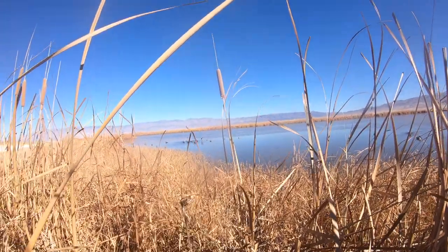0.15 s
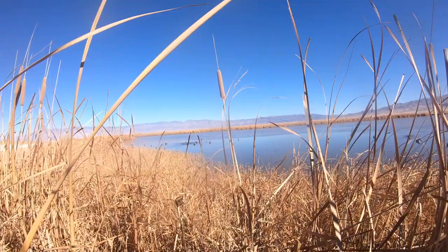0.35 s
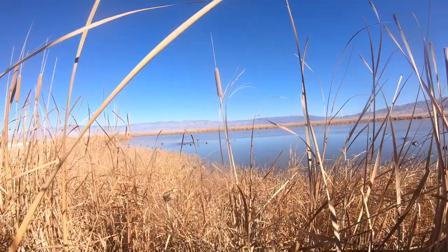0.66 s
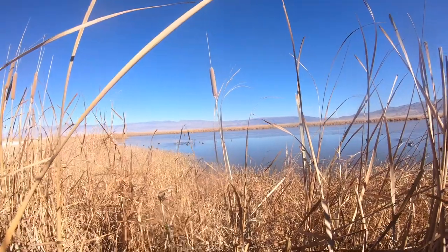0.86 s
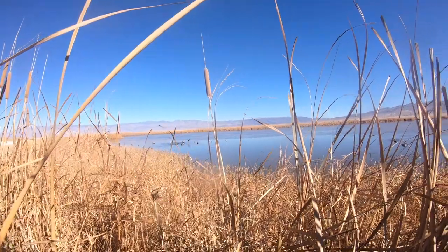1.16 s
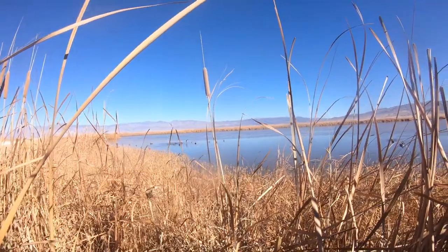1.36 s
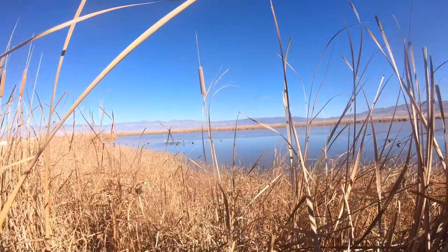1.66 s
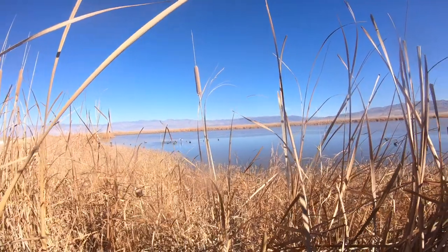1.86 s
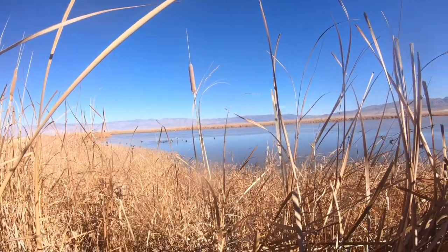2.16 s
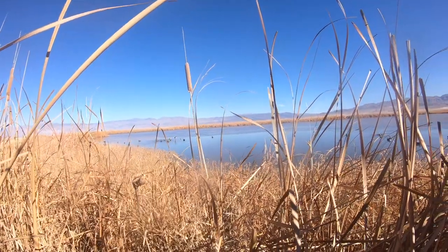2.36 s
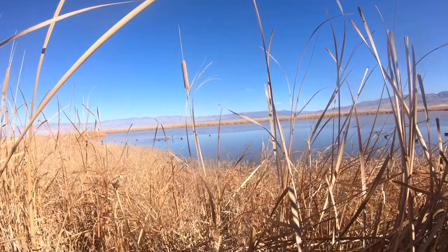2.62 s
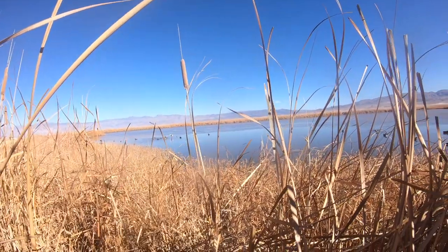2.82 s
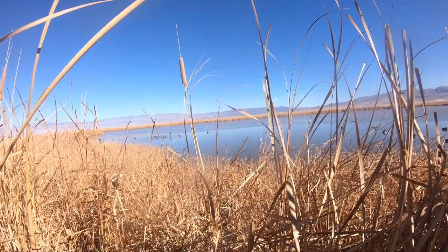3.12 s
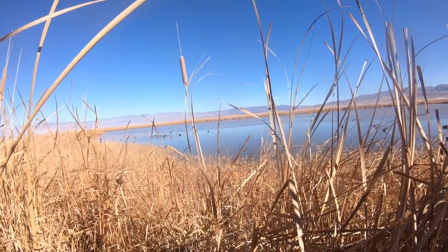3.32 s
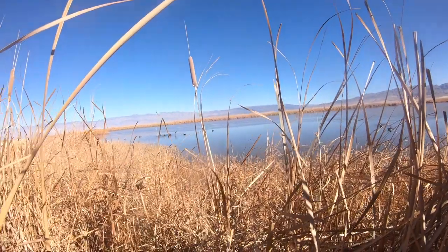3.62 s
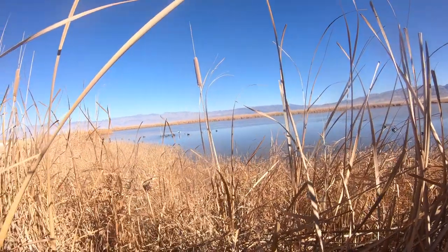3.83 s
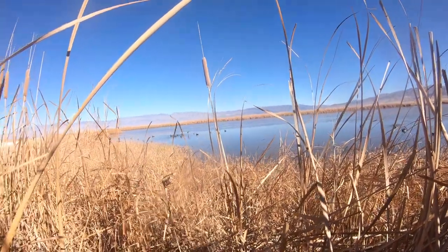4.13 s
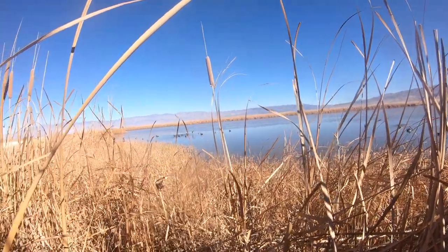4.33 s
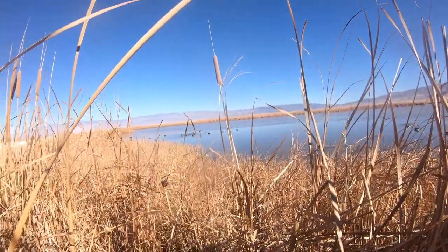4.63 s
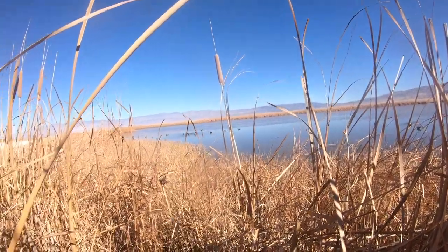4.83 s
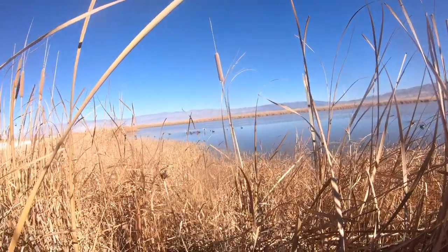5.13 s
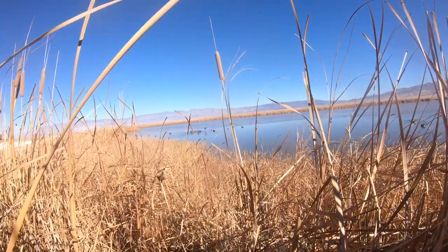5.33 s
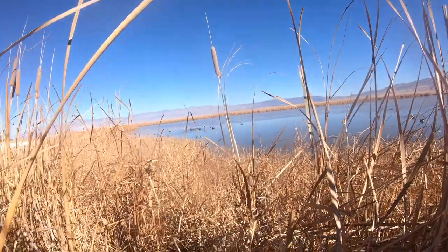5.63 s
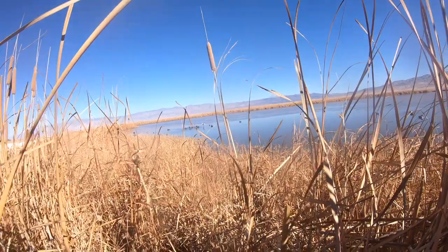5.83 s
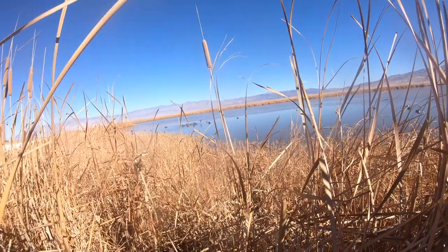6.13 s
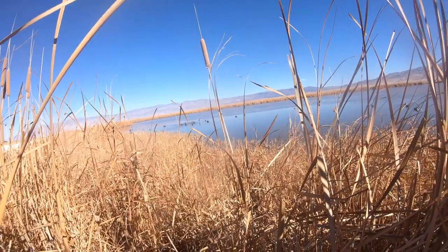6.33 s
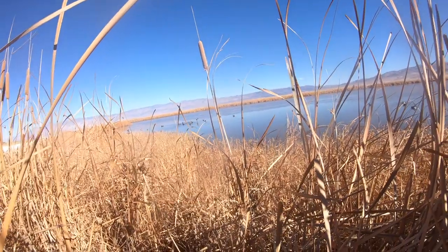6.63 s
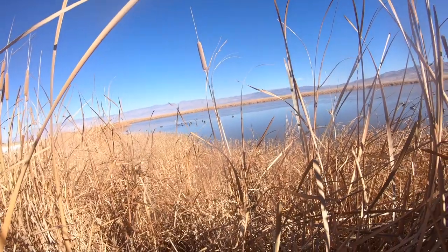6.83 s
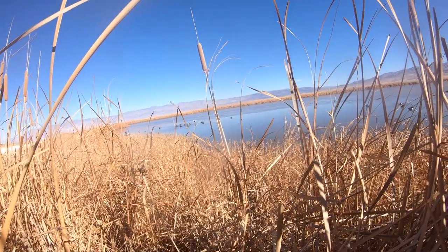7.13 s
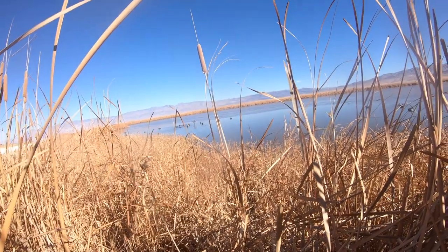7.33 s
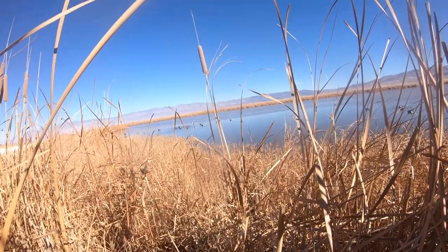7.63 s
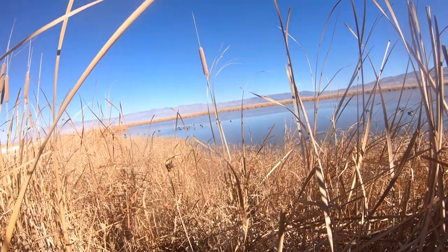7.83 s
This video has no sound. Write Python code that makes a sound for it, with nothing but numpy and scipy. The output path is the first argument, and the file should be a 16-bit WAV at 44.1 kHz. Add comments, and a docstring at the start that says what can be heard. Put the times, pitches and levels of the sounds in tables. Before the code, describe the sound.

Very close to a bed of dry reeds beside open water, blades rub in crisp, hissing sways, strongest in the first second, with scraping hollow stems. Quieter rustles come and go, with occasional ticks and snaps. In the last second the crackling thickens, a stalk strikes the microphone with a sharp, loud click on the right, and a low wind buffet follows. A faint rumble and hush lie far off.

```python
"""Beside a pond in a breeze, microphone close to a bed of dry reeds that stands mostly to the right.
Blades rub in sways of stick-slip noise, with small resonant ticks, knocks of hollow stems and fibre snaps.
Near the end a stalk hits the camera: a sharp click of decaying modes clips the right side and rings faintly.
Low noise swells as gusts buffet the microphone; a low rumble and a faint hush lie in the distance."""
import sys
import numpy as np
from scipy import signal
from scipy.fft import rfft, irfft, next_fast_len
from scipy.io import wavfile
from scipy.ndimage import uniform_filter1d, map_coordinates

SR = 44100
rng = np.random.default_rng(int(sys.argv[2]) if len(sys.argv) > 2 else 0)


def wrap_up_sound(samples):
    """Save the sound to the file named by the first command line argument, as 16-bit audio."""
    columns = np.atleast_2d(samples).T
    # keep every value between -1 and 1, then stretch to whole-number steps
    tamed = np.clip(columns, -1, 1)
    steps = np.round(tamed * 32767).astype(np.int16)
    wavfile.write(sys.argv[1], SR, steps)


N = 351477

# Close reeds, each sway sliding blades and stems over each other: start t/s, fastest t/s, end t/s,
# blade rel. level/dB, hollow stems over blades level/dB, scrape over blades level/dB
REED_SWAYS = [(-0.5, 0.07, 0.13, -37.0, 0.5, -5.5), (-0.03, 0.3, 0.61, -36.5, -4.2, -6.7),
              (0.37, 0.47, 0.54, -42.5, -8.5, -15.5), (0.57, 0.77, 1.01, -38.5, -8.0, -12.5),
              (0.8, 1.06, 1.21, -44.5, -9.0, -20.0), (0.95, 1.48, 1.54, -52.2, 3.0, -10.3),
              (1.48, 1.71, 1.83, -46.0, -7.0, -16.5), (1.57, 2.0, 2.4, -58.5, 5.0, -1.0),
              (1.94, 2.24, 2.35, -42.5, -9.0, -16.5), (1.89, 2.54, 2.69, -37.5, -4.0, -9.5),
              (2.66, 2.82, 3.16, -39.5, -10.0, -16.0), (2.86, 3.04, 3.07, -50.5, -11.0, -19.5),
              (3.01, 3.22, 3.42, -45.5, -4.5, -9.5), (3.35, 3.38, 3.8, -50.5, -4.0, -16.0),
              (3.49, 3.56, 3.65, -53.0, -6.5, -16.0), (3.88, 4.13, 4.36, -45.0, -8.5, -18.5),
              (3.82, 4.35, 4.81, -40.0, -5.5, -13.5), (4.05, 4.7, 4.82, -42.5, -5.0, -10.5),
              (4.8, 4.92, 5.29, -39.5, -14.5, -22.5), (4.86, 4.98, 5.16, -44.5, -7.0, -8.0),
              (5.17, 5.37, 5.61, -45.2, -9.5, -14.0), (5.11, 5.8, 5.96, -51.5, -1.0, -16.0),
              (5.99, 6.28, 6.39, -47.0, -6.5, -16.0), (6.35, 6.47, 6.88, -43.0, -9.0, -13.5),
              (6.76, 6.86, 7.09, -46.5, -9.0, -22.5), (6.97, 7.03, 7.19, -41.5, -7.0, -17.5),
              (7.36, 7.4, 7.46, -39.3, -4.5, -8.5), (7.09, 7.44, 7.58, -43.2, -6.0, -19.0),
              (7.5, 7.66, 7.73, -42.5, -5.5, -7.0), (7.66, 7.74, 7.98, -48.5, -1.5, -5.5)]
SPEED_POWER = 1.18  # rubbing amplitude against sliding speed
IDLE_DB, HOLLOW_BED_DB, SCRAPE_BED_DB = -64, -62.5, -69  # the bed that never quite rests


def sway():
    """Reeds speed up from rest and slow to the next turn; gives the power of blades, hollow stems, scrape."""
    t = np.arange(N) / SR
    power = amp([[IDLE_DB], [HOLLOW_BED_DB], [SCRAPE_BED_DB]]) ** 2 * breeze()
    for start, fastest, end, level_db, hollow_db, scrape_db in REED_SWAYS:
        moving = slice(*np.searchsorted(t, [start, end]))
        phase = np.interp(t[moving], [start, fastest, end], [0, .5, 1])
        speed = np.abs(np.sin(np.pi * phase))
        levels = amp(level_db) * amp([[0], [hollow_db], [scrape_db]])
        power[:, moving] += (levels * speed ** SPEED_POWER) ** 2
    return power


# Lulls over the idle reed bed and the far hush: middle t/s, length t/s, strength level/dB
# (at 0 dB the power halves)
BREEZE_LULLS = [(3.8, 0.56, 0.5), (6.0, 0.14, -5)]


def breeze():
    """Share of the breeze's usual power that is left in the lulls."""
    return 1 / (1 + swells(BREEZE_LULLS))


# Spectrum of rubbing blades, close: f/Hz, level/dB
BLADE_SPECTRUM = [(250, -29), (900, -12.5), (1900, -1.5), (2700, -2.5), (3400, -0.5), (4400, -4),
                  (5200, -2.5), (6300, -5), (7900, 1.5), (9100, -1.5), (10000, -11), (11600, -20),
                  (13000, -18.5), (15500, -30)]
# Brighter spectrum of frayed tips and flicked blades, close: f/Hz, level/dB
FLICK_SPECTRUM = [(300, -22), (1500, -2.5), (3400, -5), (4500, -4), (6500, -2.5), (8500, 5.5), (9050, 2),
                  (9700, -5.5), (11500, -17.5), (15500, -25)]


def blades(level_db):
    """Faster sliding makes more slips: a loose crackle thickens into a hiss."""
    rate = 9000 * amp(.8 * (level_db + 42))
    grain = unit(slips(rate, scatter_db=0.5) + 1.1 * rng.standard_normal((2, N)))
    hiss_gain = amp(level_db + 3.5 + 0.95 * wobble(35))
    hiss = hiss_gain * coloured(patchy(grain, depth_db=1.75), BLADE_SPECTRUM)
    # frayed tips crackle brightly, and fade less than the hiss when the sliding slows
    tips = slips(3500, scatter_db=2.5) * amp(5.6 * wobble(20))
    return hiss + amp(-55.0 + 0.57 * (level_db + 45.0)) * coloured(tips, FLICK_SPECTRUM)


# Close stalks that jam and grind for a moment: middle t/s, length t/s, level/dB
STALK_JAMS = [(.095, 0.11, -35.5), (.15, 0.067, -34.5), (.24, .12, -48), (1.685, 0.075, -43.5),
              (2.22, 0.057, -47), (2.38, .04, -41.5), (2.53, .05, -48), (2.89, .12, -50.5),
              (5.3, 0.12, -51), (7.645, 0.077, -46)]
# Spectrum of stems scraping: f/Hz, level/dB
SCRAPE_SPECTRUM = [(130, -18), (280, 3), (400, 2.5), (600, 0), (1000, -3), (2000, -48)]
# Spectrum of the air in hollow stems: f/Hz, level/dB
HOLLOW_SPECTRUM = [(350, -57), (620, -5), (820, 1), (1030, -2), (1280, 1.5), (1600, -7), (3000, -39.5)]
JAM_RING_DB = -4.5  # how strongly a jam sounds the hollow stems


def stalks(hollow_power, scrape_power):
    """Hollow stems colour the rustle, and scrape in lumps where they press together."""
    jams = swells(STALK_JAMS)
    grinding = np.sqrt(scrape_power + jams)
    rustling = np.sqrt(hollow_power + amp(JAM_RING_DB) ** 2 * jams)
    scrape_noise = unit(coloured(slips(1500, scatter_db=3.0), SCRAPE_SPECTRUM))
    scrape = scrape_noise * grinding * amp(-3.0 + 3.34 * wobble(24))
    hollow_noise = patchy(slips(6000, scatter_db=2.5), depth_db=2.0)
    hollow = unit(coloured(hollow_noise, HOLLOW_SPECTRUM)) * rustling * amp(-0.93 + 0.43 * wobble(12))
    return scrape + hollow


# Close stems that rub slowly: middle t/s, length t/s, level/dB
STEM_RUBS = [(1.32, 0.74, -53.5), (3.4, 0.74, -57.5)]


def slow_rub():
    """Stems that barely move rub in one narrow resonance."""
    return np.sqrt(swells(STEM_RUBS)) * shiver(1223, sharpness=5.1, size=N)


# Close blades that catch and flick free: t/s, crack rel. level/dB, blade f/Hz,
# stem knock rel. level/dB, stem f/Hz, decay by 60 dB t/s
BLADE_TICKS = [(1.0485, -28.5, 8700, -46, 1450, 0.034), (1.458, -43, 8000, -40, 1260, 0.08),
               (1.648, -43, 8000, -43, 3300, .07), (1.668, -30, 7600, -36, 1500, 0.1),
               (1.706, -36, 7000, -40, 1500, 0.11), (1.749, -37, 8000, -43, 2600, 0.06),
               (4.138, -27.5, 7940, -41, 3400, 0.068), (5.428, -36.5, 8550, -62, 1250, 0.085),
               (6.699, -37.5, 8300, -44, 3500, 0.057), (6.939, -36, 8500, -47, 3600, .03),
               (7.042, -32.5, 8500, -51, 2210, 0.03), (7.197, -37, 8600, -50, 696, 0.039),
               (7.24, -34.5, 8900, -38, 1530, 0.032), (7.305, -31.5, 9040, -55, 1280, 0.073),
               (7.385, -32.5, 8200, -37.5, 1210, 0.061), (7.4157, -31.5, 8070, -41, 3340, .035),
               (7.592, -26, 7550, -35, 3400, 0.046), (7.645, -33, 7450, -37.5, 3000, 0.087),
               (7.657, -29.5, 5900, -36, 2300, 0.04), (7.666, -32, 6800, -43, 2600, 0.068),
               (7.814, -37.5, 7640, -45, 1900, 0.1)]


def ticks():
    """Each flick is a dying, thinly pitched shiver of the blade that also knocks its hollow stem."""
    bright, tones = np.zeros((2, 2, N))
    t = np.arange(SR // 5) / SR
    for s, crack_db, blade_hz, stem_db, stem_hz, t60 in BLADE_TICKS:
        age = t / t60
        shape = amp(-60 * age) * (1 - np.exp(-age / 0.012))  # longer flicks also take longer to build
        add(bright, s, amp(crack_db + 1.0) * shape * rng.standard_normal((2, len(t))))
        add(tones, s, amp(crack_db - 0.5) * shape * shiver(blade_hz, sharpness=5.8, size=len(t)))
        add(tones, s, amp(stem_db + 2.0) * shape * shiver(stem_hz, sharpness=2.1, size=len(t)))
    return coloured(bright, FLICK_SPECTRUM) + tones


# Close hollow stems that knock together: t/s, rel. level/dB, lowest f/Hz, decay by 60 dB t/s,
# upper modes level/dB
STEM_TAPS = [(1.0495, -31, 740, .028, -14), (1.666, -26, 1700, .016, -8), (1.6705, -31, 760, .03, -6),
             (6.686, -27.5, 861, 0.045, 0), (7.5793, -25.5, 1110, 0.034, -7), (7.6325, -22, 680, 0.015, -6),
             (7.656, -26, 654, 0.018, 1)]
# Modes of a hollow stem: multiple of its lowest f, level/dB
STEM_MODES = [(1, -0.5), (1.73, -4), (2.42, -7), (3.07, -14)]
TAP_ATTACK_S, TAP_ROUGH = .0007, .25  # build-up, and share of the ring's power turned into buzz


def taps():
    """A knocked hollow stem rings briefly, with a dry buzz, in a few modes above its lowest pitch."""
    track, t = np.zeros((2, N)), np.arange(SR // 5) / SR
    for s, db, hz, t60, upper_db in STEM_TAPS:
        shape = amp(db - 60 * t / t60) * (1 - np.exp(-t / TAP_ATTACK_S))
        for k, (ratio, level) in enumerate(STEM_MODES):
            tone = np.sin(2 * np.pi * (hz * ratio * t + rng.random((2, 1))))
            buzz = shiver(hz * ratio, sharpness=2.4, size=len(t))
            ring = np.sqrt(1 - TAP_ROUGH) * tone + np.sqrt(TAP_ROUGH / 2) * buzz
            add(track, s, amp(level + (upper_db if k else 0)) * shape * ring)
    return track


# Close dry fibres that snap: t/s, level/dB
FIBRE_SNAPS = [(1.051, -29), (1.0983, -22), (1.666, -12), (1.6705, -22), (1.7492, -29), (6.9272, -24),
               (7.0466, -31), (7.0788, -30), (7.5948, -21.5), (7.5988, -27), (7.613, -27), (7.621, -30),
               (7.6333, -26), (7.6563, -20.5), (7.673, -28), (7.782, -35)]
SNAP_T60_S = 0.004


def snaps():
    """A dry fibre gives way at once: a hard, broad crack with no ring."""
    track, t = np.zeros((2, N)), np.arange(SR // 20) / SR
    for s, db in FIBRE_SNAPS:
        add(track, s, amp(db - 60 * t / SNAP_T60_S) * rng.standard_normal((2, len(t))))
    return coloured(track, BLADE_SPECTRUM)


# How the two microphone ports hear the near reeds: f/Hz, left minus right level/dB,
# left lead/rad, coherence (0-1)
PORT_DIFFERENCES = [(500, .6, -.2, .8), (800, -6.5, -1, .7), (1200, -6.5, .3, .6), (2000, -6, .1, .6),
                    (3000, -3.3, .2, .7), (4200, -2.2, 0, .7), (5200, -4.4, -.7, .42), (6300, -3, -1, .2),
                    (7200, -5.5, -2.1, .2), (7900, -11.5, -3.6, .3), (8800, -4, -3.8, .3),
                    (10500, -1.5, -3.8, .05), (15000, -1.3, -3.8, 0)]


def ports(pair):
    """The right port faces the reeds; the left hears them shaded, shifted and partly scattered."""
    shade, lead, alike = (np.array(PORT_DIFFERENCES)[:, [0, k]] for k in range(1, 4))

    def direct_response(hz):
        return amp(along(shade, hz)) * along(alike, hz) * np.exp(1j * along(lead, hz))

    def scattered_response(hz):
        return amp(along(shade, hz)) * np.sqrt(1 - along(alike, hz) ** 2)

    left = filtered(pair[0], direct_response) + filtered(pair[1], scattered_response)
    return np.array([left, pair[0]])


# Modes of the struck stalk and camera body, at the microphone: f/Hz, rel. level/dB, decay by 60 dB t/s
KNOCK_MODES = [(547, -27, 0.088), (660, -30, 0.12), (890, -8, 0.029), (1090, -4.5, 0.017),
               (1360, -8.5, 0.02), (1587, -5.5, 0.023), (1840, -7, 0.023), (1990, -8, 0.025),
               (3070, 4, 0.012), (3210, -9.5, 0.019), (7520, -6.5, 0.0085), (931, -39.5, 0.56),
               (980, -36, 0.44), (1020, -37, 0.37), (1390, -42, .4), (1440, -34.5, 0.89), (1760, -44, 0.66)]
CHATTER_DB, CHATTER_HZ, CHATTER_T60_S = -20.5, 1900, 0.059  # the stalk rattles on the camera
HALO_DB, HALO_HZ, HALO_T60_S = -40, 1340, 0.74  # many weak stalk modes blur into a woody afterglow


def click(s=7.7222, lead=.0019):
    """A stalk grazes the camera, then lands with a crack, rings the modes of both and chatters."""
    knock, crack, scratch = np.zeros((3, 2, N))
    t = np.arange(SR // 2) / SR
    ring = np.zeros((2, len(t)))
    for hz, db, t60 in KNOCK_MODES:
        # phase zero on the struck right side, a random phase on the left
        phase = rng.random() * np.array([[1], [0]])
        ring += amp(db - 60 * t / t60) * np.sin(2 * np.pi * (hz * t + phase))
    attack = 1 - np.exp(-t / .0003)
    chatter = shiver(CHATTER_HZ, sharpness=1, size=len(t))
    halo = shiver(HALO_HZ, sharpness=1.6, size=len(t))
    add(knock, s, amp(-1.0) * ring * attack)
    add(knock, s, amp(CHATTER_DB - 60 * t / CHATTER_T60_S) * attack * chatter)
    add(knock, s, amp(HALO_DB - 60 * t / HALO_T60_S) * attack * halo)
    graze = amp(-12 - 60 * t / .022) + amp(-36 - 60 * t / .09)  # a quick decay and a weak longer tail
    add(scratch, s - lead, graze * rng.standard_normal((2, len(t))))
    add(crack, s, amp(-17.0 - 60 * t / 0.027) * rng.standard_normal((2, len(t))))
    noise = coloured(scratch, FLICK_SPECTRUM) + coloured(crack, BLADE_SPECTRUM)
    return knock * amp([[-12], [0]]) + ports(noise)  # the knock is 12 dB weaker on the left


# Gusts that reach the microphone: middle t/s, length t/s, rel. level/dB
MICROPHONE_GUSTS = [(0, .14, -47), (1.2, .15, -58), (4.54, .1, -57), (4.71, 0.11, -52), (5.4, 0.21, -53.5),
                    (5.695, 0.16, -41.5), (6.36, 0.13, -56), (7.16, .15, -52), (7.42, 0.24, -45),
                    (7.69, 0.21, -43), (7.94, 0.27, -29.5)]
# Spectrum of slow eddies on the microphone: f/Hz, level/dB
BUFFET_SPECTRUM = [(8, -17), (22, -7), (33, -8.5), (54, -14), (85, -22), (130, -33), (500, -74)]
# Spectrum of the faster eddies in strong gusts: f/Hz, level/dB
BLAST_SPECTRUM = [(15, -17), (33, 5), (50, -5), (71, 2.5), (92, -14), (140, -20), (500, -76)]
BREEZE_DB, BREEZE_SWING_DB = -67.5, 2.5  # light air on the microphone between gusts


def buffeting():
    """Eddies push on both ports, with slow ones less alike; the strongest gusts break into faster ones."""
    light_air = amp(BREEZE_DB + BREEZE_SWING_DB * wobble(9.7)) ** 2
    gust_db = 10 * np.log10(swells(MICROPHONE_GUSTS) + light_air)
    slow = unit(coloured(rng.standard_normal((2, N)), BUFFET_SPECTRUM))
    fast = unit(coloured(rng.standard_normal((2, N)), BLAST_SPECTRUM))
    strong = np.clip((gust_db + 37) / 4, 0, 1)
    slow_eddies = spread(slow, side_db=-3) * np.sqrt(1 - strong)
    fast_eddies = amp(1.5) * spread(fast, side_db=-17) * np.sqrt(strong)
    return amp(gust_db + wobble(12)) * (slow_eddies + fast_eddies)


# Course of the far rumble: t/s, rel. level/dB
RUMBLE_LEVEL = [(0, -53.5), (.55, -52), (1, -53.5), (1.9, -57), (2.55, -56), (3.45, -54), (3.85, -59),
                (4.2, -55.5), (6.3, -56.5), (6.9, -58), (7.45, -53), (7.97, -53)]
# Spectrum of the far rumble: f/Hz, level/dB
RUMBLE_SPECTRUM = [(25, -25), (60, -11), (108, -25), (148, 3.5), (175, -0.5), (215, -1.5), (275, -14.5),
                   (520, -25), (2000, -57)]
# Spectrum of the far hush: f/Hz, level/dB
HUSH_SPECTRUM = [(250, -13), (520, -10.5), (810, 0), (1100, -8), (2500, -17.5), (9000, -30), (15000, -56)]


def distance():
    """A wavering low rumble and a faint hush, dipping slightly in the lulls, from across the open water."""
    rumble_db = np.interp(np.arange(N) / SR, *np.transpose(RUMBLE_LEVEL))
    rumble = unit(coloured(rng.standard_normal((2, N)), RUMBLE_SPECTRUM))
    hush = unit(coloured(rng.standard_normal((2, N)), HUSH_SPECTRUM))
    far_rumble = amp(rumble_db - 0.5 + wobble(6.9)) * spread(rumble, side_db=-5.5)
    return far_rumble + amp(-65.5) * breeze() ** .25 * spread(hush, side_db=9.0)


def slips(rate, scatter_db):
    """Tiny stick-slip impulses of uneven size, rate a second, scaled to rms 1."""
    hit = rng.random((2, N)) < rate / SR
    sizes = amp(scatter_db * rng.standard_normal((2, N))) * rng.standard_normal((2, N))
    return unit(hit * sizes / np.sqrt(rate))


def shiver(hz, sharpness, size):
    """Stereo noise of rms 1 passed twice through one resonance."""
    resonance = signal.iirpeak(hz, sharpness, SR)
    once = signal.lfilter(*resonance, rng.standard_normal((2, size)))
    return unit(signal.lfilter(*resonance, once))


def patchy(x, depth_db):
    """Slow random patches of gain over time and frequency, as different blades take their turn."""
    z = signal.stft(x, nperseg=512)[2]
    field = uniform_filter1d(rng.standard_normal(z.shape[1:]), size=4, axis=0)  # across frequency
    field = uniform_filter1d(field, size=12, axis=1)  # across time
    return unit(signal.istft(z * amp(depth_db * unit(field)), nperseg=512)[1][:, :N])


def swells(rows):
    """Summed power of smooth swells (middle t/s, length t/s, level/dB)."""
    t = np.arange(N) / SR
    return sum((amp(db) * np.cos(np.pi * np.clip((t - s) / length, -.5, .5))) ** 2
               for s, length, db in rows)


def wobble(rate):
    """A smooth random curve, rate knots a second."""
    knots = rng.standard_normal(int(N * rate / SR) + 4)
    return map_coordinates(knots, [np.arange(N) * rate / SR])


def spread(pair, side_db):
    """Two unrelated signals as the middle and the sides of a wide sound."""
    mid, side = pair[0], pair[1] * amp(side_db)
    return np.array([mid + side, mid - side])


def coloured(x, spectrum):
    """x through a spectrum, scaled so that white noise keeps its level."""
    return filtered(x, lambda hz: unit(amp(along(spectrum, hz))))


def filtered(x, response):
    """x times a complex response of frequency."""
    m = next_fast_len(N + SR // 2)
    return irfft(rfft(x, m) * response(np.fft.rfftfreq(m, 1 / SR)), m)[..., :N]


def along(points, hz):
    """Values between (f/Hz, value) points on a log frequency axis."""
    f, v = np.transpose(points)
    return np.interp(np.log(hz + 1), np.log(f + 1), v)


def add(track, s, sound):
    """Mix a sound into a track from time s (seconds) on."""
    part = track[..., round(s * SR):][..., :sound.shape[-1]]
    part += sound[..., :part.shape[-1]]


def amp(db):
    """Decibels to amplitude."""
    return 10 ** (np.asarray(db) / 20)


def unit(x):
    """x scaled to rms 1."""
    return x / np.sqrt(np.mean(x ** 2) + 1e-20)


def scene():
    """One sway drives blades and stems; click, wind and distance join them at the microphone."""
    rubbing, hollow, scrape = sway()
    rustle = blades(10 * np.log10(rubbing)) + stalks(hollow, scrape) + slow_rub()
    reeds = rustle + ticks() + taps() + snaps()
    return ports(reeds) + click() + buffeting() + distance()


def record(dry):
    """The camera clips at full scale, then keeps nothing above its band limit of 15.7 kHz."""
    return filtered(np.clip(dry, -1, 1), lambda hz: hz < 15700)


dry = scene()
out = record(dry)
wrap_up_sound(out)
```